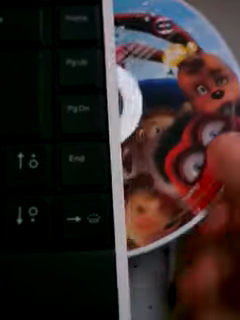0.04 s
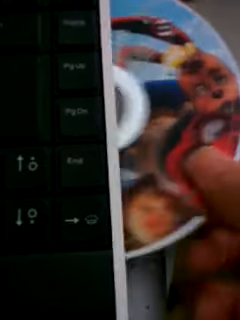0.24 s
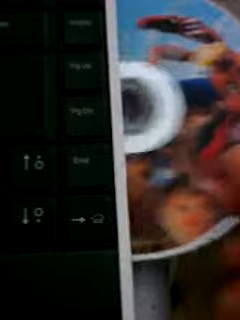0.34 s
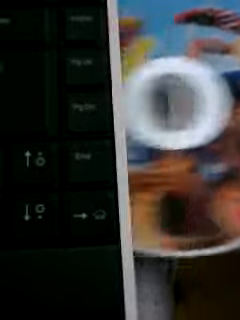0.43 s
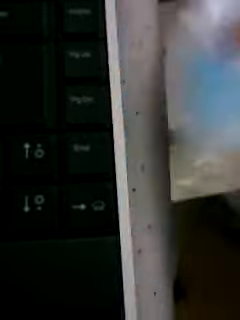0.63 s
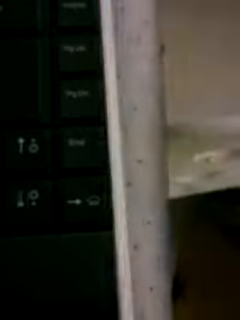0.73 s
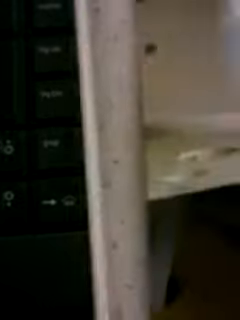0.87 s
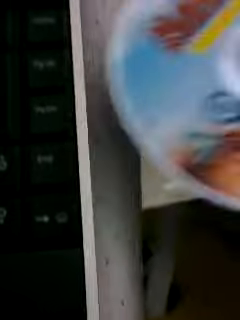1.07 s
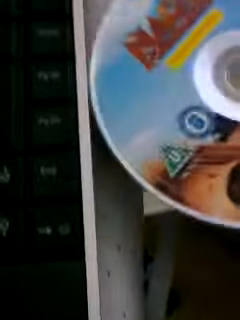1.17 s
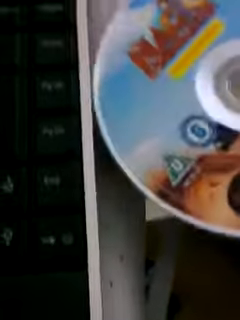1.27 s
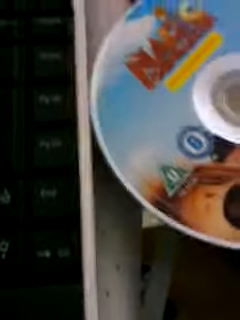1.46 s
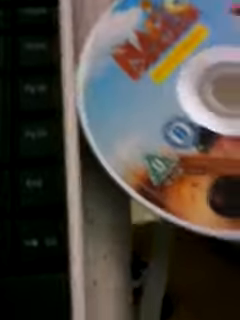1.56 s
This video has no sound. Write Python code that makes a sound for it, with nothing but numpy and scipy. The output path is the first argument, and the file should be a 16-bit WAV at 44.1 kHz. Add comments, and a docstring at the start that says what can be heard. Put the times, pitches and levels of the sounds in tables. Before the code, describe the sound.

A disc scrapes against a laptop's drive slot as it is pulled out, close up in a small, quiet room. For the first 0.3 seconds it squeaks and buzzes lightly among small knocks and ticks, then scrapes harder, slipping free with a soft knock just before 0.6 seconds. A sharp plastic click comes at about 1.2 seconds and a faint tick near 1.6. The fan hums faintly throughout.

```python
"""A laptop in a small, quiet room, close to a single microphone. Its fan hums throughout.
A disc is drawn from the drive slot: its face rubs the lip, first squeaking and buzzing lightly among
small knocks and ticks, then scraping hard until it slips free with a soft knock just before 0.6 s.
One sharp plastic click follows at 1.17 s, and a faint tick at the very end.
The recorder widens the microphone's signal with two short delays."""
import sys
import numpy as np
from scipy import signal
from scipy.fft import rfft, irfft, next_fast_len
from scipy.io import wavfile
from scipy.ndimage import uniform_filter1d, map_coordinates

SR = 44100
rng = np.random.default_rng(int(sys.argv[2]) if len(sys.argv) > 2 else 0)


def bounce(signal):
    """Save signal as a 16-bit WAV file at the path given by the first command-line argument."""
    frames = np.transpose(np.atleast_2d(signal))
    limited = np.clip(frames, -1, 1)
    pcm = np.round(limited * 32767).astype(np.int16)
    wavfile.write(sys.argv[1], SR, pcm)


N = 70560
TIME = np.arange(N) / SR
TOP_HZ = 9020


def amp(db):
    """Decibels to gain."""
    return 10 ** (np.asarray(db) / 20)


def unit(x):
    """x scaled to rms 1."""
    return x / np.sqrt(np.mean(x ** 2) + 1e-20)


def along(points, hz):
    """(frequency, value) points read at hz on a log axis."""
    freqs, values = np.transpose(points)
    return np.interp(np.log(hz + 1), np.log(freqs + 1), values)


def curves(rows):
    """One value per sample for each column after the time."""
    times, *columns = np.transpose(rows)
    return [np.interp(TIME, times, column) for column in columns]


def wobble(rate):
    """A smooth random curve, rate knots a second."""
    return map_coordinates(rng.standard_normal(N // 10), [TIME * rate], mode="wrap")


def filtered(x, response):
    """x through a complex frequency response."""
    size = next_fast_len(N + SR // 2)
    return irfft(rfft(x, size) * response(np.fft.rfftfreq(size, 1 / SR)), size)[..., :N]


def coloured(x, spectrum):
    """x shaped by a spectrum in dB, at rms 1."""
    return unit(filtered(x, lambda hz: amp(along(spectrum, hz)) * (hz < TOP_HZ)))


def noise_band(hz, width_hz):
    """A narrow band of noise at rms 1."""
    phase = 2 * np.pi * np.cumsum(hz * np.ones(N)) / SR
    return unit(wobble(width_hz) * np.cos(phase) + wobble(width_hz) * np.sin(phase))


def struck(start, modes, attack_s):
    """Damped modes set ringing at start; neighbouring modes swing in opposite directions."""
    age = np.maximum(TIME - start, 0)
    ring = np.zeros(N)
    for k, (hz, db, t60) in enumerate(modes):
        decay = amp(db + rng.normal(0, 1) - 60 * age / t60)
        ring += (-1) ** k * decay * np.sin(2 * np.pi * hz * age)
    return ring * (1 - np.exp(-age / attack_s))


# fan air and room hiss (frequency [Hz], relative level [dB])
AIR_SPECTRUM = [(18, -77), (30, -48.5), (66, -57.5), (111, -19), (145, -17.5), (202, -6), (239, -11),
                (263, -6), (334, -0.5), (404, -7), (478, -6.5), (592, -7), (770, -15.5), (848, -13),
                (1030, -18), (1430, -17), (2150, -25), (6920, -28), (9000, -28), (11700, -64.5),
                (19800, -120)]
# drift of the fan at the microphone (time [s], level [dB])
FAN_LEVEL = [(0, -54), (.55, -53), (.7, -51.5), (.82, -53), (.92, -55.5), (1.05, -52.5), (1.16, -51.5),
             (1.3, -56.5), (1.45, -57), (1.6, -54)]
# hum lines at the fan's mean level (frequency [Hz], level [dB])
FAN_HUM = [(208, -71.5), (272, -61.5), (298, -65), (339, -70.5), (404, -67.5), (582, -72.5), (928, -73)]


def fan(hiss_from_hz=820):
    """The fan's low whir and hum lines drift in level; the hiss above them is steady."""
    level_db, = curves(FAN_LEVEL)
    air = amp(level_db.mean()) * coloured(rng.standard_normal(N), AIR_SPECTRUM)
    whir = filtered(air, lambda hz: 1 / (1 + (hz / hiss_from_hz) ** 2))
    hiss = air - whir
    hum = sum(amp(db) * noise_band(hz, width_hz=16) for hz, db in FAN_HUM)
    return hiss + amp(level_db - level_db.mean()) * (whir + hum)


def grains(per_s=14000, spread_db=2):
    """Friction as dense tiny slips of uneven size."""
    slips = rng.random(N) < per_s / SR
    sizes = amp(spread_db * rng.standard_normal(N))
    return slips * sizes * np.sign(rng.standard_normal(N))


# bright scrape at the lip, before its trim (time [s], level [dB])
SCRAPE_LEVEL = [(0, -74.5), (.045, -52), (.085, -50.5), (.11, -48), (.125, -62.5), (.19, -53.5),
                (.24, -44.5), (.283, -40), (.298, -44), (.308, -37.5), (.346, -36.5), (.355, -39),
                (.375, -43), (.398, -36.5), (.405, -33), (.424, -42.5), (.44, -31.5), (.463, -32.5),
                (.476, -32.5), (.486, -32), (.503, -33), (.512, -36), (.539, -37.5), (.547, -49.5),
                (.578, -53), (.595, -70.5)]
# dull rub of the disc's face, before its trim (time [s], level [dB])
RUB_LEVEL = [(0, -61), (.04, -56.5), (.1, -53), (.18, -59), (.25, -49), (.29, -47.5), (.33, -46.5),
             (.4, -47.5), (.425, -56), (.44, -52), (.53, -51.5), (.555, -57.5), (.6, -82)]
# light scrape, hard scrape and rub, heard close (frequency [Hz], relative level [dB])
LIGHT_SPECTRUM = [(880, -51.5), (1500, -12.5), (1690, -16.5), (1950, -6.5), (2120, -3), (2250, -4),
                  (3320, -11), (3660, -5), (4350, -6), (9000, -5.5), (11700, -48), (19800, -120)]
HARD_SPECTRUM = [(880, -41), (1500, -10.5), (1720, -11), (1860, -22), (2020, -8), (2460, -12.5), (2710, -5),
                 (3250, -5), (3500, -14.5), (3610, -5), (3830, -0.5), (4900, -4), (5450, -4.5),
                 (5910, -2.5), (9000, -1), (11700, -35), (19800, -120)]
RUB_SPECTRUM = [(60, -61), (200, -34), (450, 0), (800, -0.5), (1300, 2.5), (2100, -2.5), (3000, -3.5),
                (5000, -28)]
# narrow bands of noise that give the hard scrape a slight ring
# (frequency [Hz], width [Hz], relative level [dB])
SCRAPE_BANDS = [(2030, 55, -8), (2780, 90, -9), (3950, 70, -3), (4150, 60, -6), (5505, 60, 2),
                (5880, 60, -3), (7100, 160, -2), (8700, 140, -1)]
# disc resonances that glide as the contact moves
# (time [s], length [s], from [Hz], to [Hz], width [Hz], level [dB])
DISC_GLIDES = [(.302, 0.041, 6350, 6100, 450, -39.5), (0.324, .1, 940, 1330, 160, -51.5)]
HARD_FROM_S, HARD_BY_S, FREE_S, RELEASE_DB_PER_S = 0.17, 0.5, 0.603, 513
SCRAPE_TRIM_DB, RUB_TRIM_DB, BANDS_GAIN_DB, JUDDER_DB = -1, 0.5, -12.5, 1.06


def scrape():
    """Friction grows louder and harder with the pull, and stops as the disc comes free."""
    scrape_db, = curves(SCRAPE_LEVEL)
    rub_db, = curves(RUB_LEVEL)
    hardness = np.clip((TIME - HARD_FROM_S) / (HARD_BY_S - HARD_FROM_S), 0, 1)
    light = np.sqrt(1 - hardness) * coloured(grains(), LIGHT_SPECTRUM)
    hard = np.sqrt(hardness) * coloured(grains(), HARD_SPECTRUM)
    bands = sum(amp(db) * noise_band(hz, width_hz) for hz, width_hz, db in SCRAPE_BANDS)
    slight_ring = hardness * amp(BANDS_GAIN_DB) * bands
    friction = amp(scrape_db + SCRAPE_TRIM_DB) * (light + hard + slight_ring)
    friction += amp(rub_db + RUB_TRIM_DB) * coloured(grains(), RUB_SPECTRUM)
    for start, length, from_hz, to_hz, width_hz, db in DISC_GLIDES:
        progress = np.clip((TIME - start) / length, 0, 1)
        glide_hz = from_hz + (to_hz - from_hz) * progress
        friction += amp(db) * np.sin(np.pi * progress) * noise_band(glide_hz, width_hz)
    release_db = RELEASE_DB_PER_S * np.maximum(TIME - FREE_S, 0)
    return friction * amp(JUDDER_DB * wobble(170.1) - release_db)


# buzz at the slot's lip (time [s], slip rate [Hz], level before radiation [dB])
LIP_BUZZ = [(.015, 412, -64.5), (.04, 400, -55), (.072, 447, -55.5), (.096, 454, -56), (.115, 430, -54),
            (.14, 414, -53.5), (.2, 417, -54), (.26, 416, -54), (.3, 420, -56.5), (.33, 340, -61)]
# how strongly the disc radiates each harmonic (frequency [Hz], gain [dB])
DISC_RADIATION = [(400, -17.5), (850, -10), (1270, -5), (1660, -7), (2090, -6), (2480, -8), (2690, 5.5),
                  (2920, -9.5), (3330, -40), (3750, -2.5), (4120, -17.5), (5400, -11), (7000, -13.5)]


def stick_slip(harmonics=15, waver=.002, flicker_db=3.4):
    """Under a light pull the lip grabs and lets go regularly; overtones squeak at resonances."""
    slip_hz, buzz_db = curves(LIP_BUZZ)
    phase = 2 * np.pi * np.cumsum(slip_hz * (1 + waver * wobble(120))) / SR
    buzz = np.zeros(N)
    for k in range(1, harmonics + 1):
        gain = amp(along(DISC_RADIATION, k * slip_hz) + flicker_db * wobble(33.6))
        buzz += gain * np.sin(k * phase + 2 * np.pi * rng.random())
    slipping = (TIME > LIP_BUZZ[0][0]) & (TIME < LIP_BUZZ[-1][0])
    soft_gate = uniform_filter1d(slipping.astype(float), size=400)
    return np.sqrt(2) * soft_gate * amp(buzz_db) * buzz


# the disc bumping the case (time [s], level [dB])
CASE_KNOCKS = [(.032, -41), (.0955, -40), (.1275, -41.5), (.302, -34), (.3075, -35.5), (.5755, -33.5)]
# modes of the case (frequency [Hz], relative level [dB], t60 [s])
CASE_MODES = [(581, -8.5, 0.048), (714, 3.5, 0.017), (890, -3.5, 0.018), (1130, -3.5, .012)]


def knocks():
    """Soft contacts ring only the low modes of the case."""
    return sum(amp(db) * struck(start, CASE_MODES, attack_s=0.00056) for start, db in CASE_KNOCKS)


# plastic ticks and the one sharp click (time [s], level [dB])
PLASTIC_CLICKS = [(0.0941, -34.5), (0.0963, -31.5), (0.1412, -38.5), (0.1672, -35.5), (0.279, -43),
                  (1.1715, -21), (1.5882, -43)]
# modes of the disc and the slot (frequency [Hz], relative level [dB], t60 [s])
PLASTIC_MODES = [(372, -19.5, 0.058), (908, -19.5, 0.01), (1737, -17.5, 0.023), (2424, -8.5, 0.0081),
                 (2700, -4, .013), (3040, -11, 0.016), (3510, -5.5, 0.01), (5240, -7.5, 0.0094),
                 (6064, -12, 0.009), (6360, -12, 0.012), (7510, -6, 0.009), (8780, -12, 0.014)]


def clicks(crack_db=-13, crack_t60_s=0.0065):
    """Hard contacts: a short crack and the ring of the plastic."""
    sound = np.zeros(N)
    for start, db in PLASTIC_CLICKS:
        decay = (TIME > start) * amp(crack_db - 60 * np.abs(TIME - start) / crack_t60_s)
        crack = decay * rng.standard_normal(N)
        sound += amp(db) * (struck(start, PLASTIC_MODES, attack_s=0.00042) + crack)
    return sound


# decay of the small room around the microphone (frequency [Hz], t60 [s])
ROOM_DECAY = [(200, 0.47), (2800, 0.2), (8000, 0.23)]


def room(x):
    """The room answers 5 ms late; each frequency dies at its own speed."""
    hz, age, noise = signal.stft(rng.standard_normal(SR // 2), SR, nperseg=256)
    decay = amp(-60 * age / along(ROOM_DECAY, hz)[:, None])
    _, tail = signal.istft(noise * decay, SR, nperseg=256)
    delayed = np.pad(x, (220, 0))
    return signal.fftconvolve(delayed, tail / np.linalg.norm(tail))[:N]


def scene(rubbing_room_db=-15.5, hits_room_db=-11.5, side_room_db=-14):
    """The laptop sits close and central; only the room's answer differs between left and right."""
    rubbing = scrape() + stick_slip()
    hits = clicks() + knocks()
    direct = rubbing + hits + fan()
    mid = direct + room(amp(rubbing_room_db) * rubbing + amp(hits_room_db) * hits)
    side = amp(side_room_db) * room(rubbing + hits)
    return np.array([mid + side, mid - side])


# the widener's two delayed copies of the microphone (frequency [Hz], gain [linear])
EARLY_COPY = [(200, 0.57), (1000, 0.47), (2200, 0.69), (4500, 0.15), (8500, 0.23)]
LATE_COPY = [(2000, .01), (3200, .1), (4500, .22), (8500, 0.57)]
EARLY_S, LATE_S = .00162, .00403


def record(dry):
    """The recorder adds delayed copies in opposite polarity left and right, and cuts the top."""
    def widener(hz):
        early = along(EARLY_COPY, hz) * np.exp(-2j * np.pi * hz * EARLY_S)
        late = along(LATE_COPY, hz) * np.exp(-2j * np.pi * hz * LATE_S)
        return early - late

    side = filtered(dry.mean(axis=0), widener)
    return filtered(dry + np.array([side, -side]), lambda hz: hz < TOP_HZ)


dry = scene()
out = record(dry)
bounce(out)
```